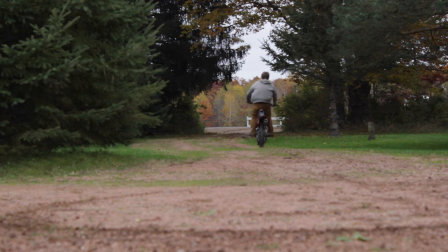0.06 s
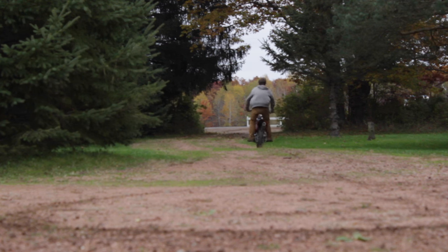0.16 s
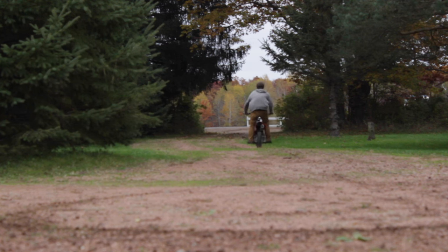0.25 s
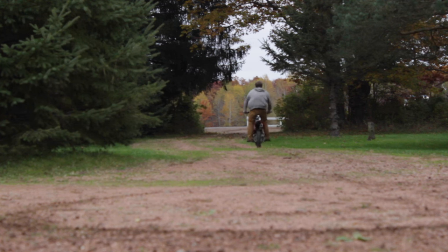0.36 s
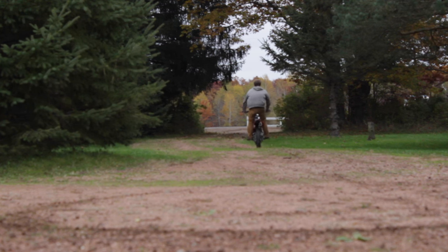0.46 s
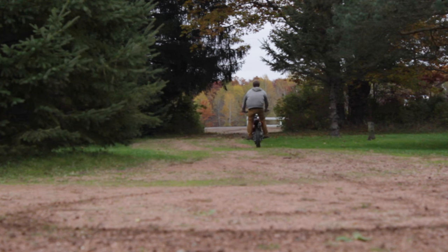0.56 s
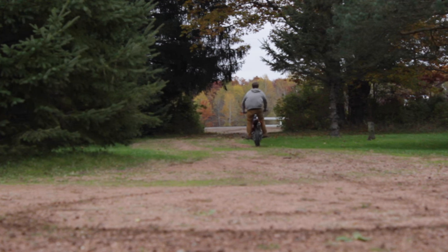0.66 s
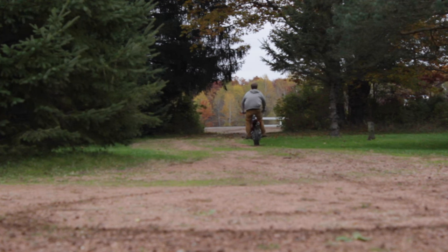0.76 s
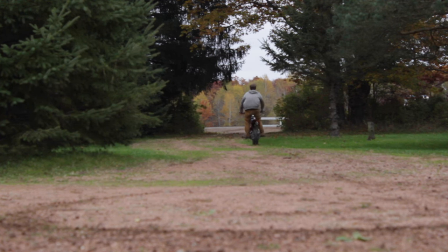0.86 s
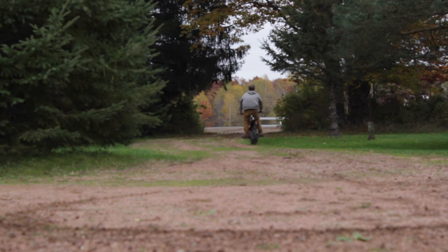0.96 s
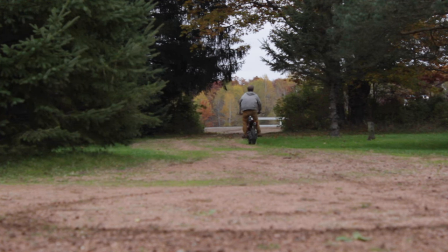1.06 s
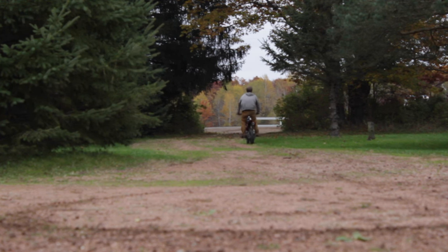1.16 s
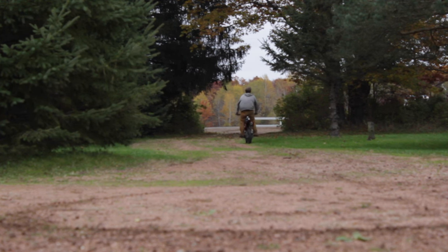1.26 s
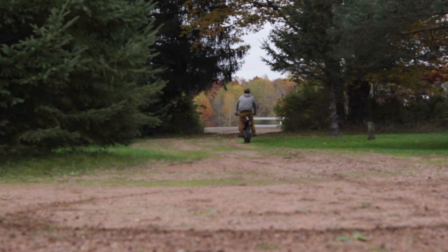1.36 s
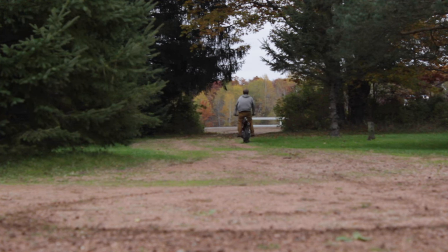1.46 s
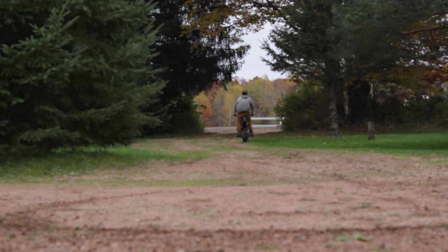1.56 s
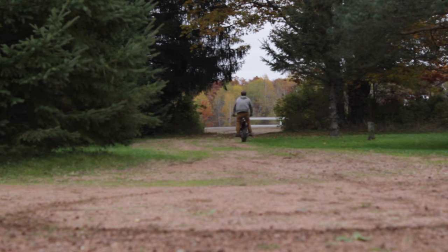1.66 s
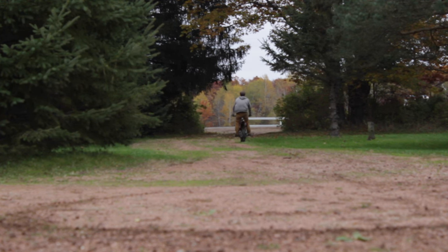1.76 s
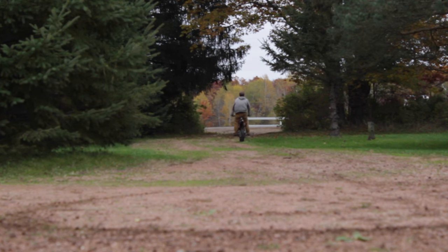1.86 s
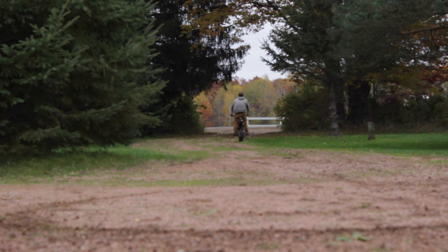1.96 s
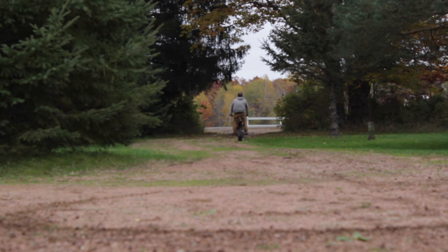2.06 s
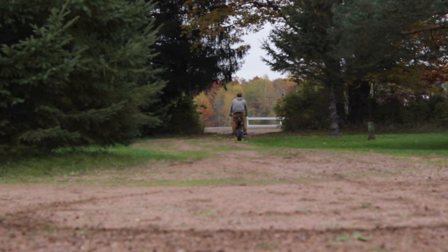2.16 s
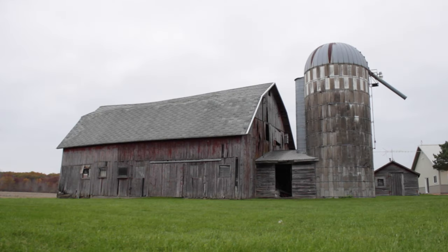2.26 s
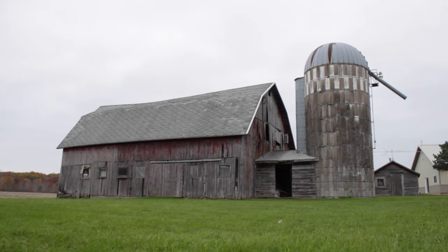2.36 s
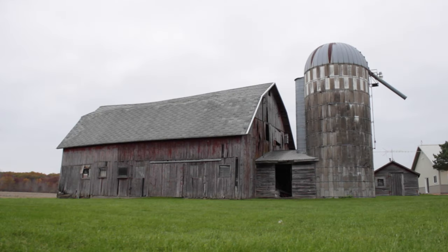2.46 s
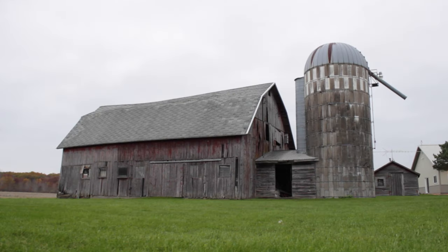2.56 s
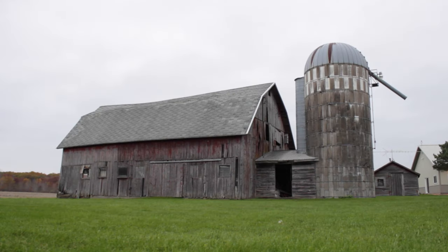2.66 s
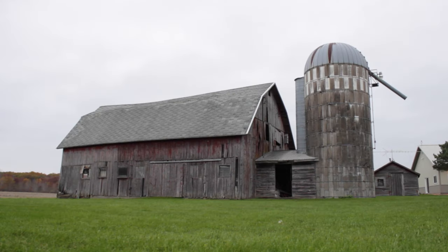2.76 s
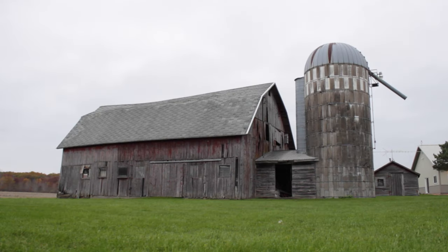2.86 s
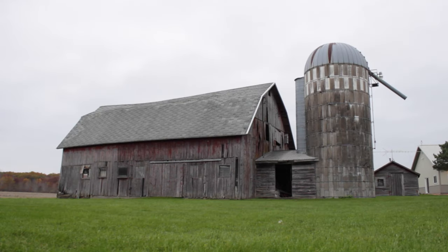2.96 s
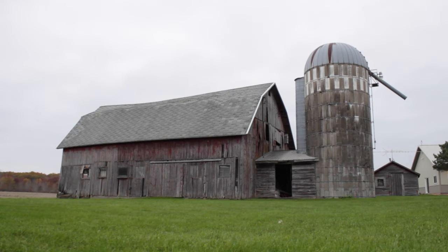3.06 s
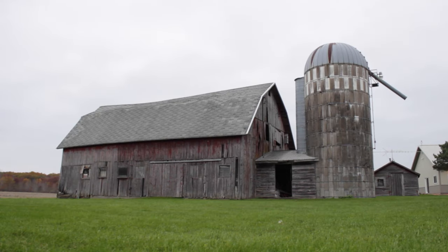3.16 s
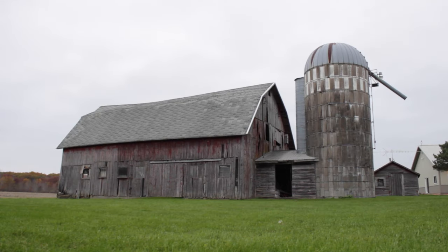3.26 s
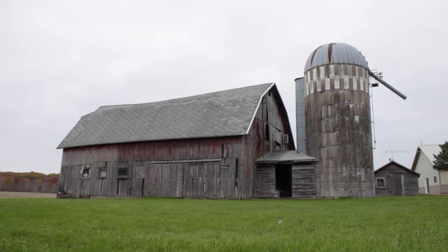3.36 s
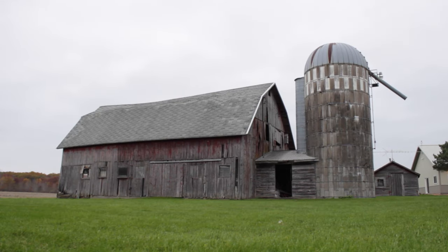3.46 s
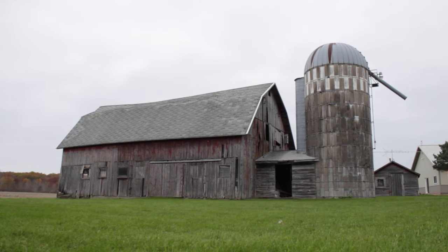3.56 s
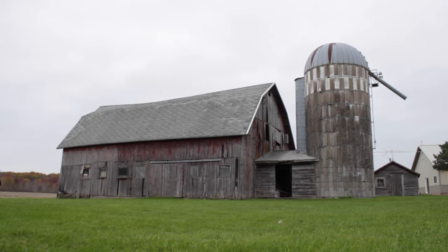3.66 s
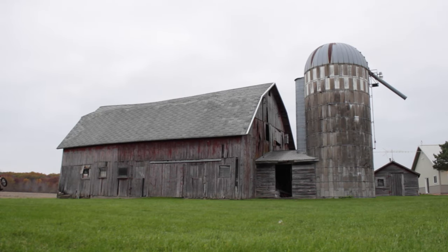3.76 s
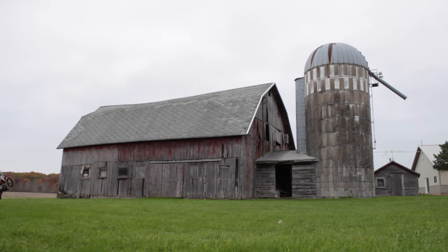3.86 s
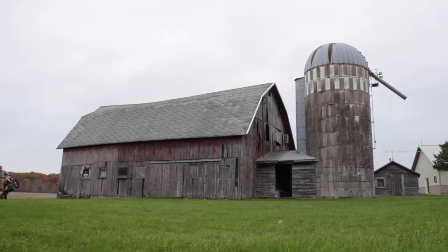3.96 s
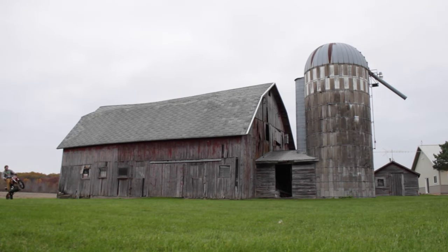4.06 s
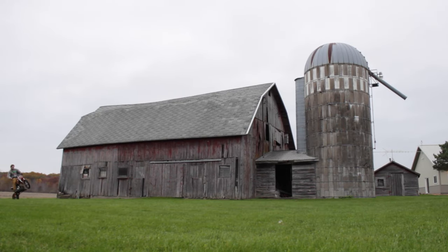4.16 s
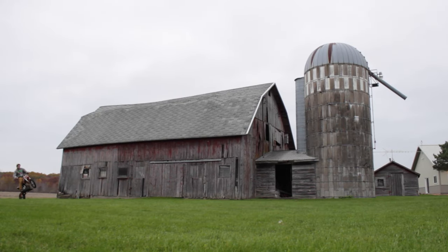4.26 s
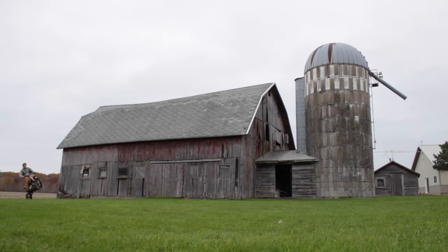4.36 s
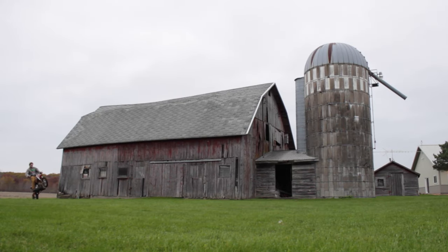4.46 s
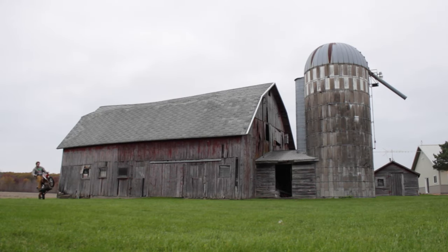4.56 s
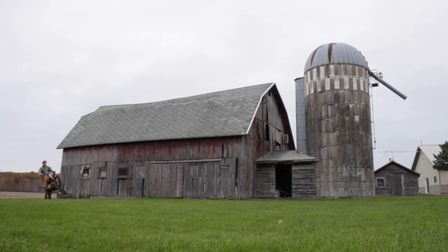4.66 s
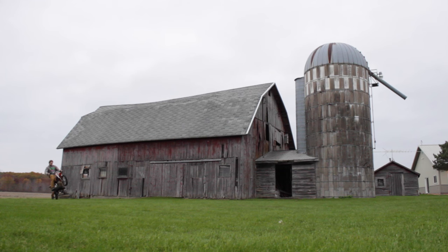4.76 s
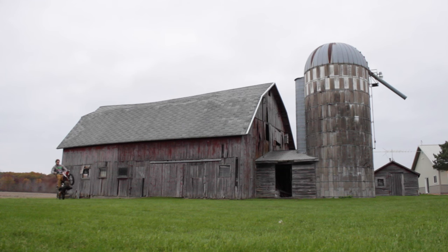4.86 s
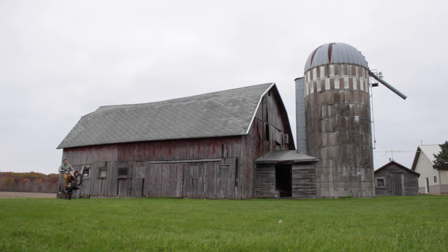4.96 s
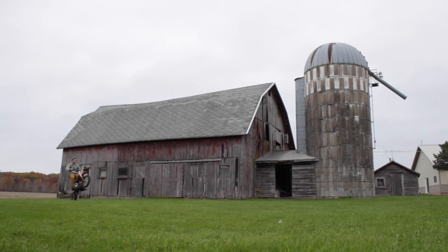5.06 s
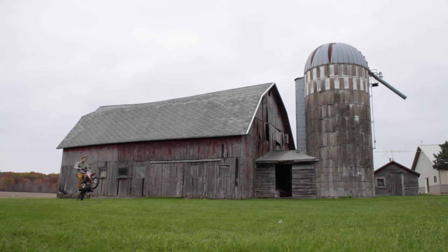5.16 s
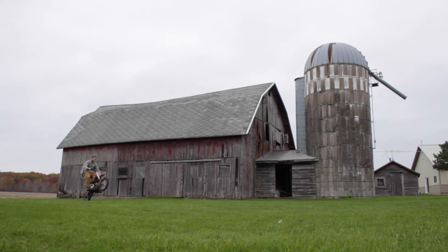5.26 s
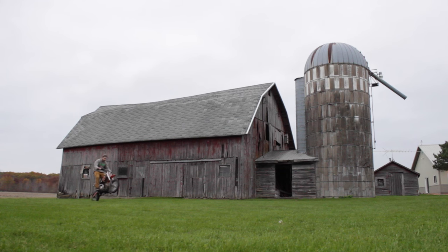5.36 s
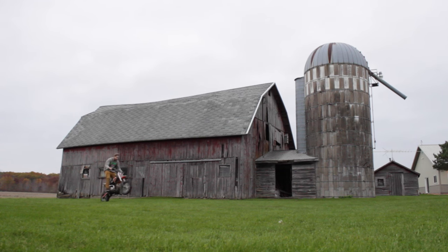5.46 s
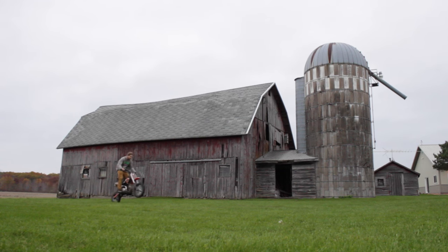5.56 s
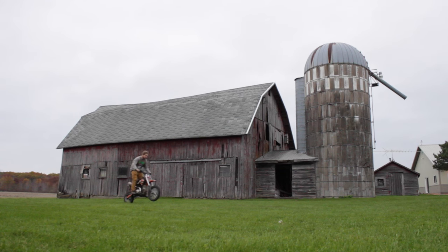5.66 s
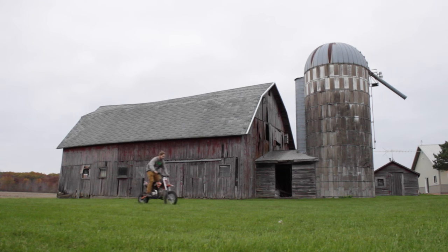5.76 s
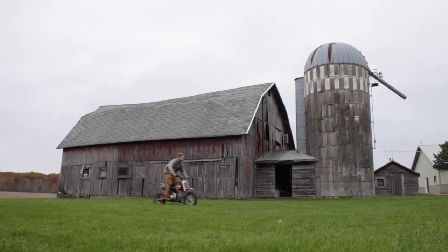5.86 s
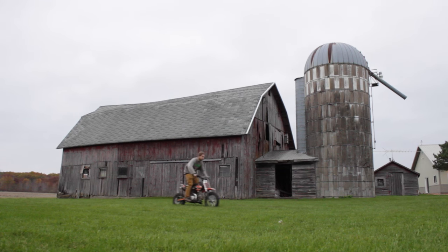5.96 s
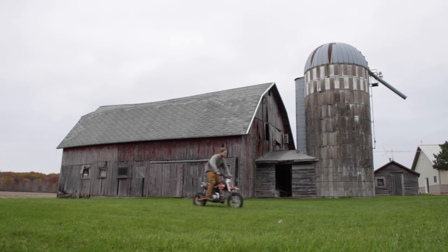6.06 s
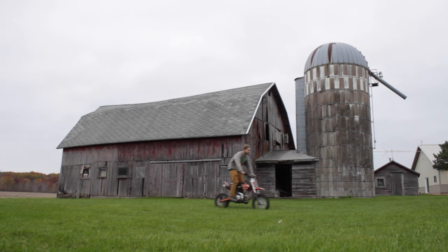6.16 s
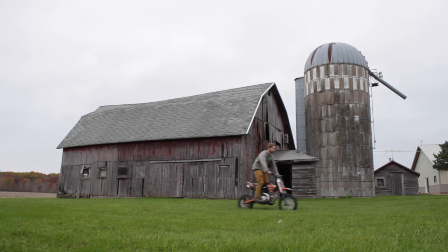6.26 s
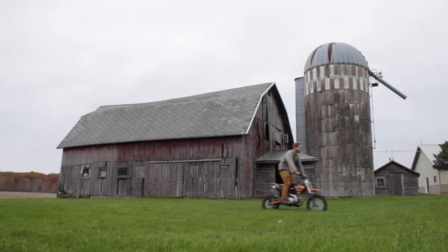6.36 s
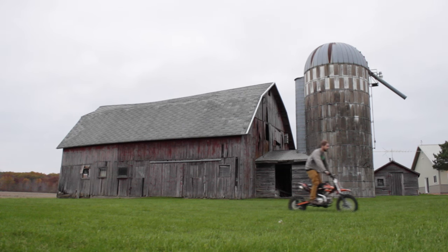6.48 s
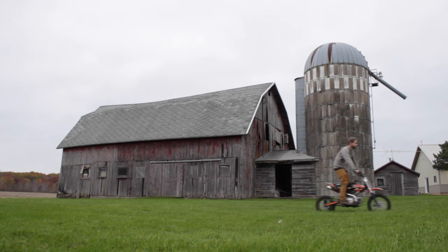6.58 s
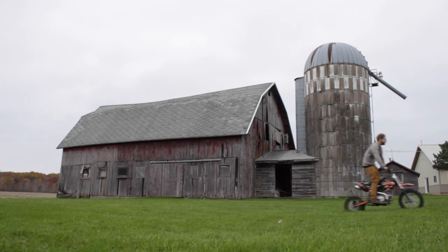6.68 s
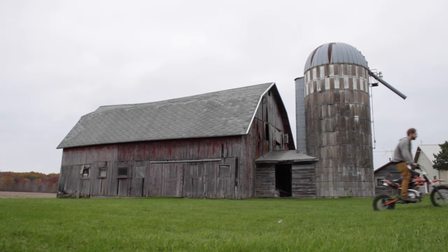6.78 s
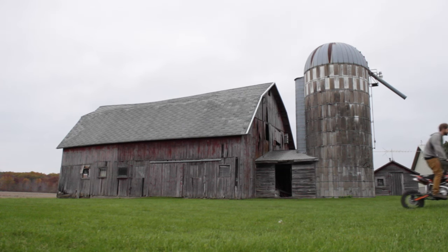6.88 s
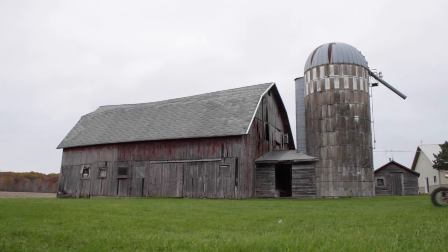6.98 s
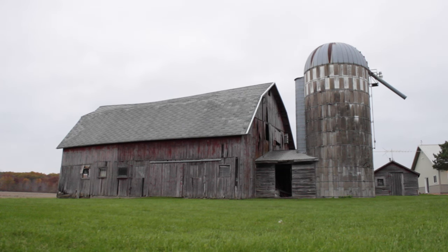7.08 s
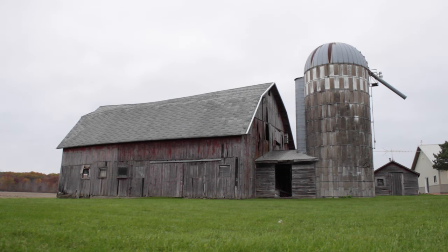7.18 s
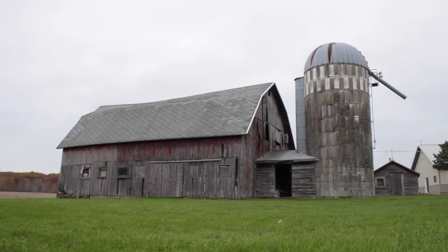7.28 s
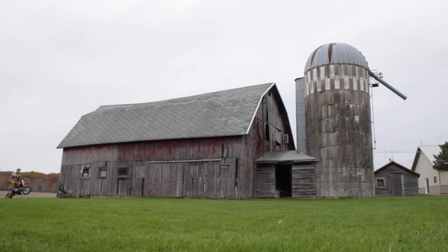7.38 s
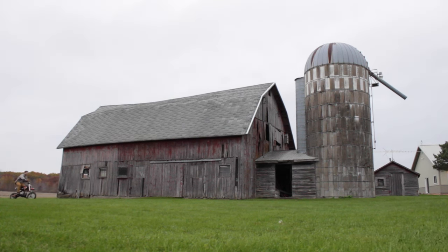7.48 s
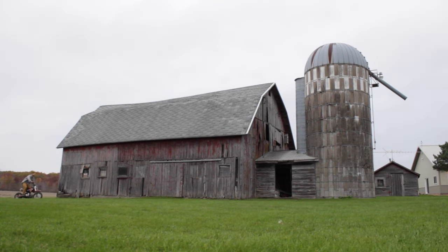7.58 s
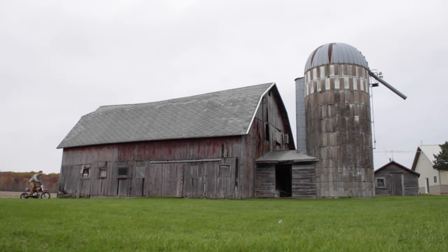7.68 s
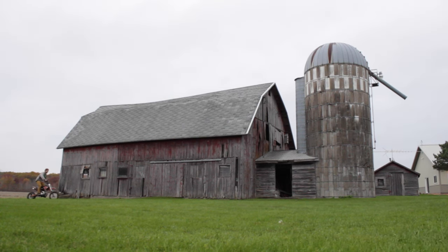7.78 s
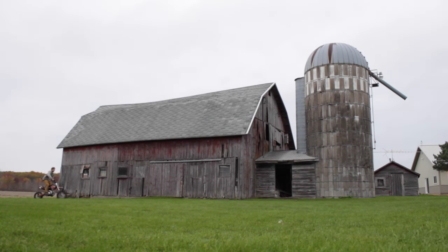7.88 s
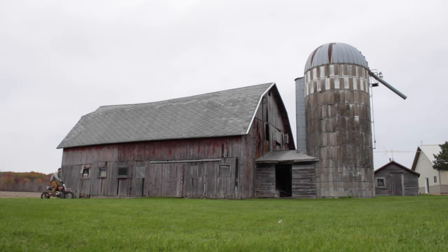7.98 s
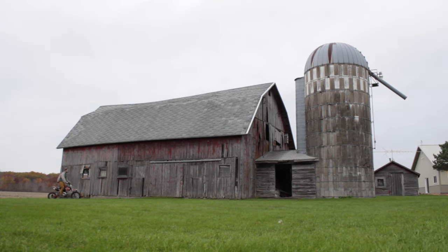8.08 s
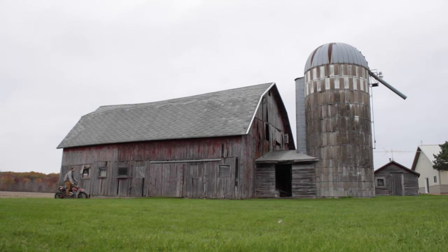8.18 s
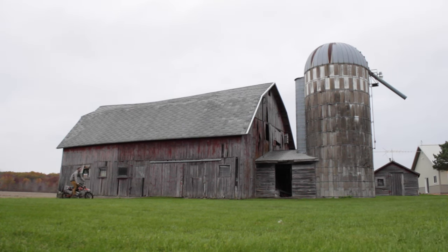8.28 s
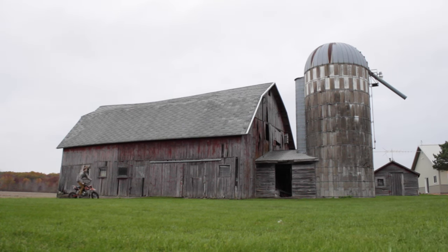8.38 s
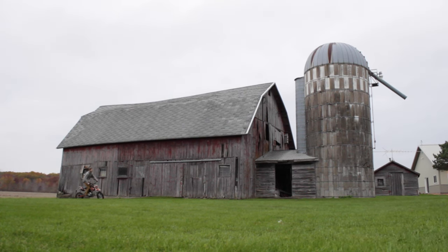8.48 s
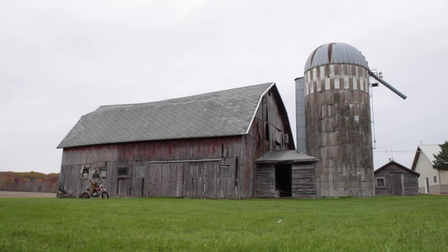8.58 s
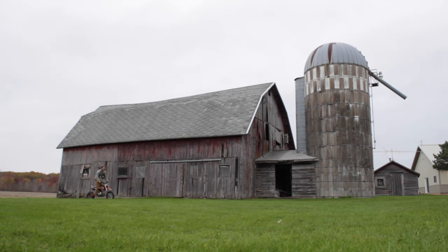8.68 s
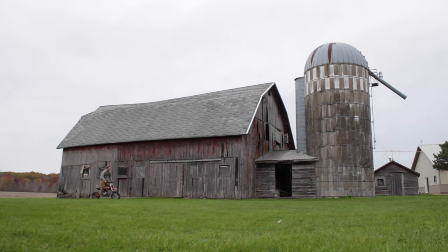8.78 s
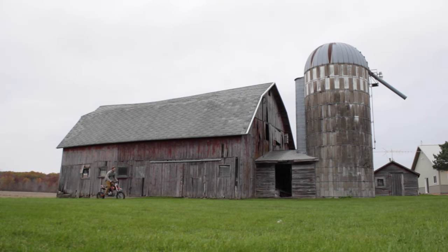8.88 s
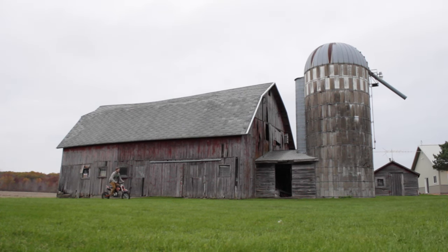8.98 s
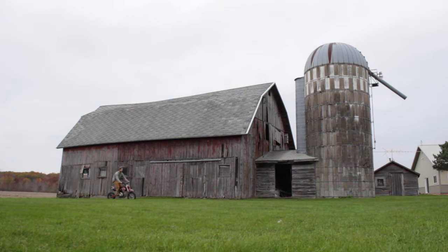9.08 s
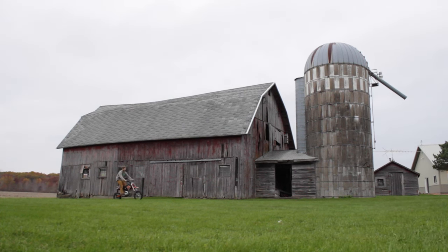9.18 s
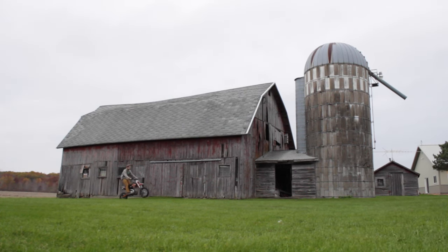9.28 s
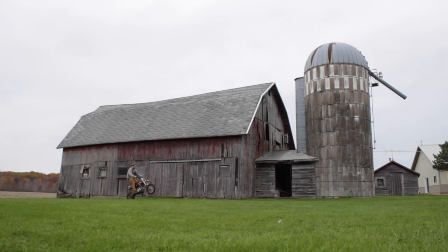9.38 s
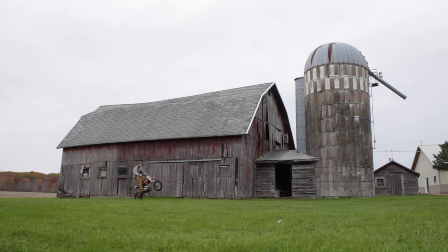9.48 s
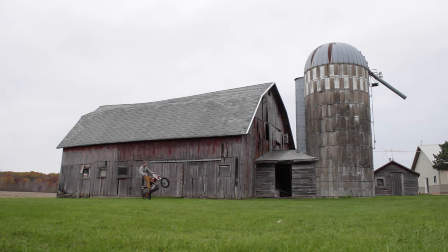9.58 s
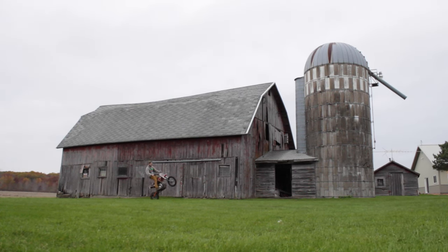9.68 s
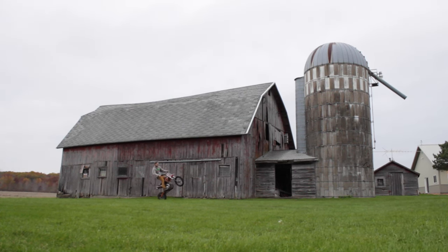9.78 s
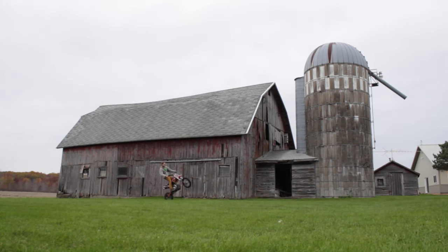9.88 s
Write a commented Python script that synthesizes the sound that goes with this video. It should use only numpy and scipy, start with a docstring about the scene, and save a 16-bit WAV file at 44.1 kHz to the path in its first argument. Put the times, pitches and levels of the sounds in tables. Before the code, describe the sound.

Three abruptly joined views of one small motorbike. First, hard exhaust bark from behind, receding between trees with scattered echoes and pops. Next, a thumpy idle heard from the side, repeated throttle twists growing louder, then throttle shut and a sputtering roll past up close. Last, a slower, farther putter with three blips, low wind gusts and a faint metallic ping. Fixed outdoor microphone, short dull reflections, faint air.

```python
"""A farmyard with a gravel drive, where a small single-cylinder four-stroke bike is heard in three parts.
It pulls away down the drive; it idles, revs and coasts past; then it idles and blips in a breeze.
Each firing radiates a pressure pulse and a spit of turbulent gas from the pipe.
The valve gear clatters in between, and each place adds its own reflections over faint outdoor air."""
import sys
import numpy as np
from scipy import signal
from scipy.fft import rfft, irfft, next_fast_len
from scipy.io import wavfile
from scipy.ndimage import uniform_filter1d

SR = 44100
rng = np.random.default_rng(int(sys.argv[2]) if len(sys.argv) > 2 else 0)


def inscribe(sig):
    """Save sig as 16-bit PCM at rate SR to the path in sys.argv[1].

    A 1-D sig is mono; a 2-D sig holds one channel per row.
    Samples are clipped to [-1, 1] before scaling.
    """
    pcm = np.round(np.clip(np.atleast_2d(sig).T, -1, 1) * 32767)
    wavfile.write(sys.argv[1], SR, pcm.astype(np.int16))


N = 437913

TIME = np.arange(N) / SR
SIZE = next_fast_len(N + SR)
HZ = np.maximum(np.arange(SIZE // 2 + 1) * SR / SIZE, 1)

# The three parts. Each: start in seconds, first firing in seconds, end in seconds.
DRIVE_PART, PASS_PART, BREEZE_PART = (0, .0036, 2.305), (2.305, 2.3204, 7.39), (7.39, 7.4143, 9.94)
# Engine speed at the ends of each part. Each: firings per second at the start, at the end.
DRIVE_RATES, PASS_RATES, BREEZE_RATES = (42.66, 46.58), (27.65, 32.85), (24.18, 28.99)

# Single firings that stand out. Each row: time in seconds, pulse change in dB, gas spit change in dB.
POPS = [(1.204, 9.5, 13), (1.244, 7.5, 0), (1.325, 6.5, 4), (1.405, 8.5, -1), (1.59, 7, 12.5),
        (6.89, 2.5, -12), (7.035, -1, 4), (7.113, 0, 3.5), (7.14, -3, 3), (7.226, 0.5, 4), (7.254, 1, 6),
        (7.283, 1, 5.5), (7.312, 2, 7)]
# Twists of the throttle. Each row: opening in seconds, shutting in seconds, firings per second at
# opening, firings per second at shutting, extra firings per second midway.
TWISTS = [(0, .54, 42.66, 55.35, -1.29), (.56, 1.15, 55.23, 52.45, 1.09), (1.45, 2.305, 48.62, 46.58, 1.1),
          (2.58, 2.71, 23.67, 26.23, 5.5), (3.13, 3.74, 27.76, 42.15, 3.58),
          (4.07, 4.53, 31.1, 43.01, 1.22), (4.68, 4.97, 41.6, 45.2, 1.22), (5.16, 5.98, 39.82, 56.47, 1.65),
          (6.06, 6.84, 50.64, 43.62, -.52), (7.69, 7.86, 23.75, 29.63, 2.51),
          (8.34, 8.48, 22.12, 26.7, 3.51), (9.18, 9.7, 23, 34.66, 4.6)]
# How hard each twist pulls, at REFERENCE_M and before the trims of each part. Each row: thump in dB,
# bark in dB, gas spit in dB, clatter in dB, swell from opening to shutting in dB (taken in shares),
# spit lost as the rider eases off in dB.
PULLS = [(-22, -15, -33.5, -36, -0.5, -2.5), (-24.5, -22, -45.5, -40, -2, -2.5),
         (-31, -32, -60.5, -45, 4, -10.5), (-20, -35, -36.5, -48, 10, 5.5),
         (-20.5, -27, -33.5, -44, 0, 15.5), (-21.5, -26.5, -34, -40, 5.5, 10.5),
         (-20, -22.5, -35.5, -36, 0, 5), (-19.5, -17.5, -27.5, -33.5, 11, 1.5),
         (-16.5, -30, -40, -37.5, -13, -1), (-21.5, -35, -40.5, -51, 11, 3), (-20, -38.5, -46, -56, 4, 18),
         (-19, -28.5, -36, -44, 3, 6.5)]

# Exhaust pulse spectra, heard from the rear and the side. Each row: frequency in Hz, relative level in dB.
REAR_PULSE_SPECTRUM = [(30, -29), (60, -17), (110, -9), (150, -3), (200, 1.5), (270, 2), (440, 3.5),
                       (580, 5.5), (670, 4.5), (810, 2), (1250, -7), (1700, -39), (2600, -64)]
SIDE_PULSE_SPECTRUM = [(25, -27), (50, -3), (90, -7.5), (150, 2.5), (230, 6), (410, 4), (620, -6.5),
                       (800, -19), (1200, -14.5), (2000, -60)]
# Gas jet spectra from the rear, the side and afar. Each row: frequency in Hz, relative level in dB.
REAR_JET_SPECTRUM = [(880, 8), (1500, -5.5), (1920, -4.5), (2590, -3), (3410, 5), (4830, -8.5),
                     (6560, -8.5), (11800, -20), (16000, -42)]
SIDE_JET_SPECTRUM = [(530, -14), (880, -8.5), (1200, -5), (1310, -6), (1550, -4), (2020, -2.5),
                     (2800, -1.5), (3400, 1.5), (3750, -1.5), (4520, -8.5), (12100, -23.5), (15100, -28.5),
                     (16000, -41)]
FAR_JET_SPECTRUM = [(530, -37), (900, -13.5), (1290, -3.5), (1550, -11), (1720, -4.5), (3510, -0.5),
                    (5820, -14.5), (13700, -22.5), (16000, -28)]
# Wind rumble and outdoor air spectra. Each row: frequency in Hz, relative level in dB.
WIND_SPECTRUM = [(15, -11), (30, -19), (55, -1.5), (90, 1.5), (140, -4), (220, -14.5), (370, -20.5),
                 (650, -34), (1500, -47.5), (4000, -68)]
AIR_SPECTRUM = [(20, -10), (60, 6), (150, 16), (400, -4), (900, -42), (3500, -49), (6000, -39.5),
                (16000, -47)]
# Resonances of engine metal. Each row: frequency in Hz, width in Hz, relative level in dB.
METAL_MODES = [(2730, 70, -12), (3570, 150, 8), (3680, 110, 10), (4770, 210, 5), (5520, 210, -6),
               (8570, 370, -4.5)]

# Distance of the bike. Each row: time in seconds, distance in metres.
DRIVE_PATH = [(0, 13), (.55, 15.5), (1.2, 24.7), (2.3, 26.5)]
PASS_PATH = [(2.3, 38), (3.999, 22.9), (4.601, 27), (5.15, 21.5), (5.7, 10.7), (6.1, 15.8), (6.799, 8.4),
             (7.15, 4.7), (7.39, 6)]
BREEZE_PATH = [(7.39, 22.56), (8.8, 28), (9.3, 20.3), (9.93, 21.4)]
# Echoes between the trees along the drive. Each row: delay in seconds, linear gain.
DRIVE_ECHOES = [(.0022, 0.52), (.004, 0.28), (.0075, .3)]
# Echo off the farm buildings as the bike moves along them, then a later copy of each pulse whose lag shortens.
# Each row: time in seconds, lag in seconds.
ECHO_LAG = [(3.1, 0.0097), (4, 0.0074), (4.3, 0.0043), (4.5, 0.0061), (4.95, 0.012), (5.3, .016),
            (5.6, .011), (5.95, 0.0078)]
# Beaming of the highest treble as the bike turns. Each row: time in seconds, treble gain in dB.
BEAM = [(2.6, 1), (3.7, 1), (4.15, 6.5), (4.9, 5), (5.7, -4.5), (6.8, -0.5)]
# Gusts on the microphone. Each row: time of the peak in seconds, relative peak level in dB.
GUSTS = [(7.41, -21), (7.69, -26), (8.18, -27.5), (8.53, -26.5), (8.77, -26), (8.98, -28), (9.37, -22),
         (9.9, -25)]

# Throttle shut, at COAST_RATE and REFERENCE_M. Each: thump, bark, gas spit and clatter in dB, before trims.
DRIVE_COAST = (-38, -45.5, -66.5, -50.5)
PASS_COAST = (-20.5, -43.5, -48, -42)
BREEZE_COAST = (-18, -36, -40.5, -40)
COAST_RATE = 40  # firings per second
REFERENCE_M = 20

# In the next four settings the order is thump, bark, gas spit, clatter.
COAST_DB_PER_OCTAVE = (20.7, 32.8, 27.3, 27.8)  # growth with speed, throttle shut
PULL_DB_PER_OCTAVE = (0, 4, 10, 9.5)  # growth with speed, throttle open
SWELL_SHARES = (0.2, .9, 0.57, 0.37)  # share taken of a swell
NEARNESS_SHARES = (0.73, 0.99, 1, 0.56)  # share taken of the distance law

OPENING_S, SHUTTING_S = 0.042, 0.043
COAST_SAG = .1  # midway dip, as a share of the fall in speed
EASE_SHARE = 0.28  # the last part of a twist, in which the rider eases off
GEAR_ORDERS = (28, 56, 76)  # multiples of the firing rate
GUST_S, BREEZE_DB = 0.03, -29.5  # half-length of a gust at 1/e power; relative breeze between gusts
CUTOFF_HZ = 16000


def from_db(db):
    """Logarithmic level: decibels to amplitude gain."""
    return 10 ** (np.asarray(db) / 20)


def at_times(rows, times):
    """Linear interpolation: the columns of a time table at the given times."""
    seconds, *columns = np.transpose(rows)
    return [np.interp(times, seconds, column) for column in columns]


def response(points):
    """Frequency response: a spectrum table, interpolated over log frequency, as gain."""
    hz, db = np.transpose(points)
    return from_db(np.interp(np.log(HZ), np.log(hz), db, right=-120))


def colour(x, gain):
    """Linear filtering: multiply the spectrum by a gain per frequency."""
    return irfft(rfft(x, SIZE) * gain, SIZE)[:N]


def unit_power(gain):
    """Power normalisation: scale a filter so that its mean squared gain is one."""
    return gain / np.sqrt(np.mean(np.abs(gain) ** 2))


def noise(gain):
    """Filtered random noise: a coloured spectrum with an rms near one."""
    return colour(rng.standard_normal(N), unit_power(gain))


def delay(seconds):
    """Propagation delay: a phase that falls linearly with frequency."""
    return np.exp(-2j * np.pi * HZ * seconds)


def clicks(times, sizes):
    """Impulse train: one click of the given size at each time."""
    samples = np.clip(np.round(times * SR).astype(int), 0, N - 1)
    return np.bincount(samples, sizes, N)


def fade(x, seconds):
    """Exponential relaxation: a click becomes a fast-rising, slowly dying bump of the same area."""
    for time_constant in (seconds, seconds / 4):
        r = np.exp(-1 / (SR * time_constant))
        x = signal.lfilter([1 - r], [1, -r], x + 1e-18)
    return x


def during(part):
    """Gating: one within a part and zero outside, with a crossfade of a few milliseconds."""
    start, _, end = part
    return uniform_filter1d(1. * ((TIME >= start) & (TIME < end)), size=220)


def outdoor_air():
    """Ambient noise: steady random sound with the faint spectrum of open air."""
    return from_db(-35.5) * noise(response(AIR_SPECTRUM))


def pulling_away():
    """Directivity: the pipe faces the microphone, so pulses are hard until the trees close in."""
    times, rate = crank(DRIVE_PART, DRIVE_RATES, idle_jitter_s=0.00028)
    levels = effort(DRIVE_PART, times, rate, DRIVE_COAST, DRIVE_PATH)
    thumps, barks, spits, rattles = firings(times, rate, levels, uneven_db=0.46)

    pipe = pipe_response(REAR_PULSE_SPECTRUM, muffler_hz=99, damping=0.55, pipe_s=0.004, pipe_echo=0.011)
    pulses = exhaust(times, from_db(3) * thumps, from_db(1.0) * barks, pipe, knee_hz=395)
    pulses = receding(pulses, far_from_s=0.24, far_by_s=0.75, near_share=0.14,
                      rustle_db=-18, rustle_hz=1343)
    gas = from_db(4.5) * spit(times, spits, REAR_JET_SPECTRUM, lead_s=0.00022, spit_s=0.00041,
                              front_db=-5.5, scatter_db=1.3)
    metal = clatter(times, rate, rattles, REAR_JET_SPECTRUM, valve_db=-2.5, valve_turn=0.39,
                    valve_s=0.0078, whirr_db=-3.5, metal_db=-27.0)
    bike = yard(pulses + gas + metal, wet_db=-19.5, decay_s=0.095, dull_hz=704)
    return bike * during(DRIVE_PART)


def twists_in(part):
    """Throttle events: the twists that open within a part, each with its pull."""
    return [(twist, pull) for twist, pull in zip(TWISTS, PULLS) if part[0] <= twist[0] < part[2]]


def engine_speed(part, end_rates):
    """Engine kinematics: speed in firings per second, arched by each twist and sagging between."""
    def arc(start, end, first, last, midway):
        u = (TIME - start) / max(end - start, 1 / SR)
        inside = (u >= 0) * (u < 1)
        return inside * (first + (last - first) * u + 4 * u * (1 - u) * midway)

    def coast(start, end, first, last):
        sag = COAST_SAG * max(first - last, 0)
        return arc(start, end, first, last, -sag) * (TIME < end)

    rate, since, speed = 0, part[0], end_rates[0]
    for (opens, shuts, first, last, midway), _ in twists_in(part):
        rate = rate + coast(since, opens, speed, first) + arc(opens, shuts, first, last, midway)
        since, speed = shuts, last
    rate = rate + coast(since, part[2], speed, end_rates[1])
    return np.maximum(rate, 20)


def crank(part, end_rates, idle_jitter_s):
    """Phase integration: times and rates of the firings; a slow engine turns less evenly."""
    _, first_firing, end = part
    speed = engine_speed(part, end_rates)
    cycles = np.cumsum(speed) / SR
    cycles -= np.interp(first_firing, TIME, cycles)
    whole_cycles = np.arange(np.interp(end, TIME, cycles))
    times = np.interp(whole_cycles, cycles, TIME)
    rate = np.interp(times, TIME, speed)
    jitter = idle_jitter_s * (25 / rate) ** 4 * rng.standard_normal(len(times))
    return times + jitter, rate


def effort(part, times, rate, coast_db, path):
    """Engine load and distance law: thump, bark, spit and clatter in dB from speed, throttle and metres."""
    db = np.array(coast_db)[:, None] + np.outer(COAST_DB_PER_OCTAVE, np.log2(rate / COAST_RATE))
    for (opens, shuts, first, last, _), (*pull_db, swell_db, ease_db) in twists_in(part):
        throttle = np.interp(times, [opens - OPENING_S, opens, shuts, shuts + SHUTTING_S], [0, 1, 1, 0])
        progress = np.interp(times, [opens, shuts], [0, 1])
        pulling = np.array(pull_db)[:, None] + np.outer(SWELL_SHARES, swell_db * (progress - .5))
        octaves = np.log2(2 * rate / (first + last))  # from the mean of the end speeds
        pulling += np.outer(PULL_DB_PER_OCTAVE, octaves)
        pulling[2] -= ease_db * np.interp(progress, [1 - EASE_SHARE, 1], [0, 1])
        db = db + throttle * (pulling - db)
    metres, = at_times(path, times)
    return db + np.outer(NEARNESS_SHARES, 20 * np.log10(REFERENCE_M / metres))


def firings(times, rate, levels_db, uneven_db):
    """Cyclic variation: sizes of every firing, with combustion more uneven at low speed."""
    burn = uneven_db * (40 / rate) * rng.standard_normal(len(times))
    crackle = burn.copy()
    for at, pulse_db, gas_db in POPS:
        nearest = np.abs(times - at) * rate < .5
        burn = burn + pulse_db * nearest
        crackle = crackle + gas_db * nearest
    thump, bark, gas, metal = levels_db
    sizes = from_db([thump + burn, bark + burn, gas + crackle, metal])
    return sizes * np.sqrt(SR / rate)  # keeps power independent of the firing rate


def pipe_response(shape, muffler_hz, damping, pipe_s, pipe_echo):
    """Resonator and reflection: a ringing muffler radiates little bass; a dull echo returns in the pipe."""
    s = 1j * HZ / muffler_hz
    muffler = s * s / (s * s + damping * s + 1)
    echo = pipe_echo * delay(pipe_s) / (1 + (HZ / 300) ** 2)
    return response(shape) * muffler * (1 + echo)


def exhaust(times, thumps, barks, pipe, knee_hz, size=4096):
    """Wave steepening: one pressure pulse per firing, with more upper harmonics the more it barks."""
    hz = np.arange(size // 2 + 1) * SR / size
    pulse = np.interp(hz, HZ, pipe)
    thump_band = (hz > 110) & (hz < 300)
    bark_band = (hz > 380) & (hz < 1200)
    slope = np.log(1 + (hz / knee_hz) ** 2)
    slope /= np.interp(500, hz, slope) - np.interp(190, hz, slope)
    band_ratio = np.linalg.norm(pulse[thump_band]) / np.linalg.norm(pulse[bark_band])
    steepness = barks / thumps * band_ratio
    pulses = pulse * np.minimum(steepness, 1.5)[:, None] ** slope
    # the thump band of each pulse sets its size
    pulses *= (thumps * np.sqrt(size / 2) / np.linalg.norm(pulses[:, thump_band], axis=1))[:, None]
    waves = np.roll(irfft(pulses), size // 2, axis=1)
    starts = np.clip(np.round(times * SR).astype(int), 0, N)
    out = np.zeros(N + size)
    for at, wave in zip(starts, waves):
        out[at:at + size] += wave
    return out[size // 2:][:N]


def receding(x, far_from_s, far_by_s, near_share, rustle_db, rustle_hz):
    """Scattering: with distance, echoes rival the direct pulse and foliage adds a rough wash."""
    far = np.interp(TIME, [far_from_s, far_by_s], [near_share, 1])
    echo_gain = sum(gain * delay(seconds) for seconds, gain in DRIVE_ECHOES)
    echoes = colour(x, echo_gain / (1 + (HZ / 900) ** 2))
    relative_hz = HZ / rustle_hz
    wash = noise(relative_hz / (1 + relative_hz ** 10)) * np.sqrt(fade(x ** 2, 0.0054))
    return x * (1 - 0.045 * far) + far * (echoes + from_db(rustle_db) * wash)


def spit(times, sizes, shape, lead_s, spit_s, front_db, scatter_db):
    """Jet turbulence: each pulse has a sharp front and a short burst of noisy gas behind it."""
    sizes = sizes * from_db(scatter_db * rng.standard_normal(len(times)))
    jet = response(shape)
    front = -colour(clicks(times - lead_s, sizes), unit_power(jet / (1 + HZ / 5000)))
    gas_power = fade(clicks(times - lead_s, sizes ** 2), spit_s)
    return from_db(front_db) * front + noise(jet) * np.sqrt(gas_power)


def clatter(times, rate, sizes, shape, valve_db, valve_turn, valve_s, whirr_db, metal_db):
    """Impact and modal ringing: valves closing after each firing and whirring gears excite the metal."""
    taps = sizes * from_db(valve_db + 2.5 * rng.standard_normal(len(times)))
    power = fade(clicks(times + valve_turn / rate, taps ** 2), valve_s)
    power += from_db(2 * whirr_db) * np.interp(TIME, times, sizes ** 2 * rate / SR)
    modes = 0
    for k, (hz, width, db) in enumerate(METAL_MODES):
        modes = modes + (-1) ** k * from_db(db) / (1 + 2j * (HZ - hz) / width)
    return (noise(response(shape)) + from_db(metal_db) * noise(modes)) * np.sqrt(power)


def yard(x, wet_db, decay_s, dull_hz):
    """Diffuse reflection: trees and wooden walls scatter back a short, dull tail."""
    age = TIME[:SR // 2]
    tail = rng.standard_normal(SR // 2) * np.exp(-age / decay_s) * (age > .002)
    tail_gain = rfft(tail, SIZE) / np.linalg.norm(tail) / (1 + 1j * HZ / dull_hz)
    return x + from_db(wet_db) * colour(x, tail_gain)


def passing():
    """Side radiation: the bike idles, revs along the buildings and rolls past with the throttle shut."""
    times, rate = crank(PASS_PART, PASS_RATES, idle_jitter_s=0.00077)
    levels = effort(PASS_PART, times, rate, PASS_COAST, PASS_PATH)
    thumps, barks, spits, rattles = firings(times, rate, levels, uneven_db=1.52)

    pipe = pipe_response(SIDE_PULSE_SPECTRUM, muffler_hz=110.0, damping=0.87, pipe_s=0.006, pipe_echo=0.16)
    pulses = exhaust(times, from_db(-1.9) * thumps, from_db(-4.4) * barks, pipe, knee_hz=258)
    pulses = pulses + echo_pulses(times, thumps, barks, pipe, echo_db=-13.5, dull_db=-0.5)
    gulps = from_db(-7.5) * np.sqrt(thumps * barks)
    boom = intake(times + 0.044 / rate, gulps, airbox_hz=91, damping=0.65)
    gas = spit(times, spits, SIDE_JET_SPECTRUM, lead_s=0.00081, spit_s=0.0015,
               front_db=-6, scatter_db=-1.46)
    metal = clatter(times, rate, rattles, SIDE_JET_SPECTRUM, valve_db=-4.5, valve_turn=0.276,
                    valve_s=0.0032, whirr_db=-2.5, metal_db=-8)
    whine = from_db(-14.5) * gear_whine(times, rate, rattles, wander=0.057)
    treble = beamed(gas + metal, corner_hz=9100)
    bike = yard(pulses + boom + whine + treble, wet_db=-11, decay_s=0.12, dull_hz=1150)
    return bike * during(PASS_PART)


def echo_pulses(times, thumps, barks, pipe, echo_db, dull_db):
    """Delayed copies: each pulse returns with a shifting lag, off the buildings at first, weaker when the bike
    is close."""
    lag, = at_times(ECHO_LAG, times)
    metres, = at_times(PASS_PATH, times)
    gain = from_db(echo_db) * np.minimum(metres / REFERENCE_M, 1)
    return exhaust(times + lag, gain * thumps, gain * from_db(dull_db) * barks, pipe, knee_hz=256)


def intake(times, sizes, airbox_hz, damping):
    """Cavity resonance: each gulp of air makes the air box boom."""
    s = 1j * HZ / airbox_hz
    airbox = (s / (s * s + damping * s + 1)) ** 2
    return -colour(clicks(times, sizes), unit_power(airbox))


def gear_whine(times, rate, sizes, wander):
    """Gear-mesh excitation: teeth sing at multiples of the firing rate with a wavering phase."""
    turn = 2 * np.pi * np.cumsum(np.interp(TIME, times, rate)) / SR
    tones = 0
    for order in GEAR_ORDERS:
        waver = wander * noise(1 / (1 + (HZ / 25) ** 2))
        tones = tones + np.sin(order * (turn + waver))
    return tones * np.interp(TIME, times, sizes * np.sqrt(rate / SR))


def beamed(x, corner_hz):
    """High-frequency directivity: the top rises or falls as the bike turns."""
    top_db, = at_times(BEAM, TIME)
    top = colour(x, 1 / (1 + (corner_hz / HZ) ** 6))
    return x + (from_db(top_db) - 1) * top


def blipping():
    """Intermittent load: the bike idles between blips while gusts rumble on the microphone."""
    times, rate = crank(BREEZE_PART, BREEZE_RATES, idle_jitter_s=0.00045)
    levels = effort(BREEZE_PART, times, rate, BREEZE_COAST, BREEZE_PATH)
    thumps, barks, spits, rattles = firings(times, rate, levels, uneven_db=1.4)

    pipe = pipe_response(SIDE_PULSE_SPECTRUM, muffler_hz=103, damping=1.0, pipe_s=0.00635, pipe_echo=0.3)
    pulses = exhaust(times, from_db(-4.5) * thumps, from_db(-3.0) * barks, pipe, knee_hz=260)
    gas = from_db(-1.4) * spit(times, spits, FAR_JET_SPECTRUM, lead_s=.0007, spit_s=0.0011,
                               front_db=-7.5, scatter_db=0.7)
    metal = clatter(times, rate, rattles, FAR_JET_SPECTRUM, valve_db=-3.5, valve_turn=0.27,
                    valve_s=0.0019, whirr_db=-1.5, metal_db=-15)
    bike = yard(pulses + gas + metal, wet_db=-4.5, decay_s=0.025, dull_hz=1210)
    wind = from_db(4.0) * gusting() * noise(response(WIND_SPECTRUM))
    ring = ping(start_s=9.585, hz=2900, level_db=-36, decay_s=.09)
    return (bike + wind + ring) * during(BREEZE_PART)


def gusting():
    """Power addition: wind strength as a steady breeze with brief gusts on top."""
    power = from_db(BREEZE_DB) ** 2
    for peak_s, db in GUSTS:
        power = power + from_db(db) ** 2 * np.exp(-((TIME - peak_s) / GUST_S) ** 2)
    return np.sqrt(power)


def ping(start_s, hz, level_db, decay_s):
    """Damped free vibration: a jolted metal part of the bike rings on."""
    age = np.maximum(TIME - start_s, 0)
    return from_db(level_db) * np.sin(2 * np.pi * hz * age) * np.exp(-age / decay_s)


def scene():
    """Superposition: the three parts in succession over faint outdoor air."""
    return (outdoor_air() + pulling_away() + passing() + blipping())[None]


def record(dry):
    """Overload and band limiting: the strongest peaks are clipped and the top is cut."""
    clipped = np.clip(dry, -1, 1)
    return colour(clipped[0], 1 / (1 + (HZ / CUTOFF_HZ) ** 120))[None]


dry = scene()
out = record(dry)
inscribe(out)
```